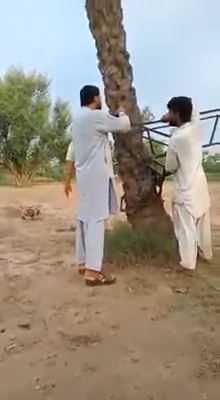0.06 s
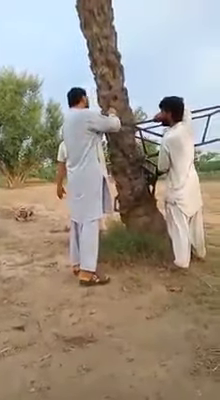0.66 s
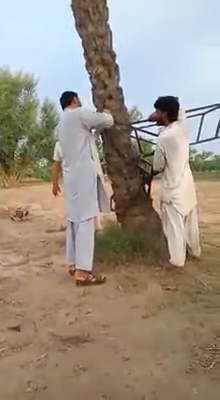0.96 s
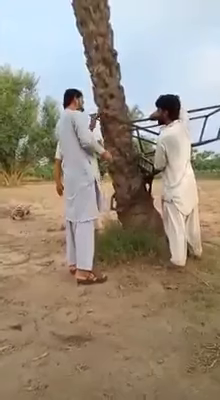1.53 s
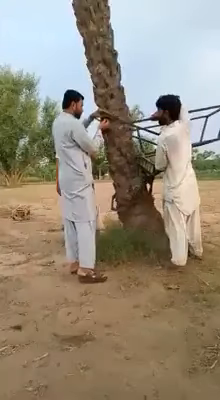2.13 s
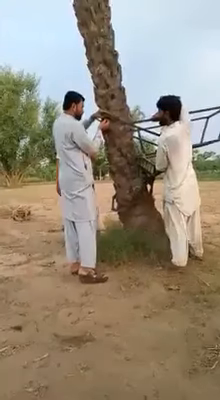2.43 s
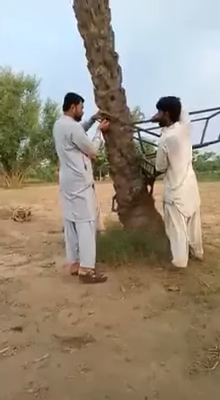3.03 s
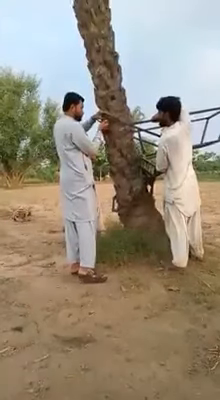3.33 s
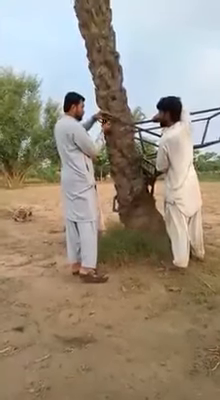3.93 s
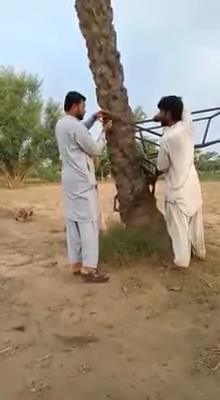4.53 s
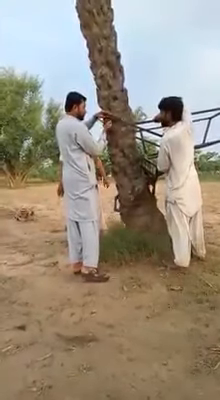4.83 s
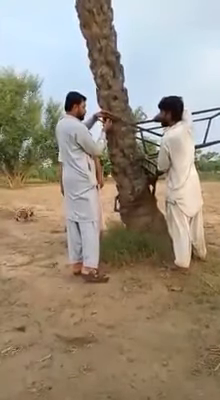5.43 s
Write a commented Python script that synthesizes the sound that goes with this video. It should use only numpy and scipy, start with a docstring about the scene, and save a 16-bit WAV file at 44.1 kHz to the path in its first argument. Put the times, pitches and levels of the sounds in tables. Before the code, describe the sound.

A metal frame cracks and rings against a tree trunk, then a rope rasps in quick tugs, with birds and a distant engine.

```python
"""Rope on a palm trunk

A rope is worked tight round a palm trunk that carries a metal frame, in an open field. The frame
slips on the dry bark with harsh cracks that ring its tubes, then the rope rasps in a run of quick
stick-slip tugs. Birds whistle, leaves stir, a far engine thuds steadily, and the hand-held
microphone takes light puffs of breeze and a few bumps."""
import sys
import numpy as np
from scipy import signal
from scipy.fft import rfft, irfft
from scipy.io import wavfile
from scipy.ndimage import uniform_filter1d

SR = 44100
rng = np.random.default_rng(int(sys.argv[2]) if len(sys.argv) > 2 else 0)


def digitize_waveform(pressure):
    """Quantize a signal to 16-bit integers and store it at the path in sys.argv[1].

    Rows of a 2-D input are taken as channels; values are limited to [-1, 1].
    """
    field = np.atleast_2d(pressure).T
    bounded = np.clip(field, -1, 1)
    quanta = np.round(bounded * 32767).astype(np.int16)
    wavfile.write(sys.argv[1], SR, quanta)


N = 246078
TIME = np.arange(N) / SR


def from_db(db):
    return 10 ** (np.asarray(db) / 20)


def unit_rms(x):
    return x / np.sqrt(np.mean(x ** 2) + 1e-20)


def drift(rate_hz):
    """Random wander, rms 1."""
    knots = rng.standard_normal(8000)
    return unit_rms(np.interp(TIME * rate_hz, np.arange(len(knots)), knots))


def curve(rows):
    """Straight lines through (seconds, value) points."""
    return np.interp(TIME, *np.transpose(rows))


def swells(rows):
    """Gain envelope of Gaussian humps."""
    return sum(from_db(db) * np.exp(-((TIME - s) / half_s) ** 2) for s, half_s, db in rows)


def grains(per_s):
    """Impulses of random time and size."""
    return (rng.random(N) < per_s / SR) * rng.standard_normal(N)


def butter(x, order, hz, kind="low"):
    return signal.sosfilt(signal.butter(order, hz, kind, fs=SR, output="sos"), x + 1e-18)


def colour(x, spectrum):
    """Minimum-phase filter through (Hz, dB) points; keeps the power of white noise."""
    size = 2 ** 18
    hz, db = np.transpose(spectrum)
    bin_hz = np.arange(size // 2 + 1) * SR / size
    gain = unit_rms(from_db(np.interp(np.log(bin_hz + 1), np.log(hz), db)))
    cepstrum = irfft(np.log(gain))
    cepstrum[1:size // 2] *= 2
    cepstrum[size // 2 + 1:] = 0
    return irfft(rfft(x, size) * np.exp(rfft(cepstrum)))[:N]


def outdoors(x, t60_s, wet_db, cutoff_hz):
    """Ground and trees scatter back a short, dull tail."""
    t = TIME[:SR // 2]
    tail = butter(rng.standard_normal(len(t)), 2, cutoff_hz)
    tail *= from_db(-60 * t / t60_s) * (t > .006)
    return x + from_db(wet_db) * signal.fftconvolve(x, tail / np.linalg.norm(tail))[:N]


def patchy(x, depth_db):
    """Each third of an octave swells and fades on its own; the highest hiss stays steady."""
    hz = np.maximum(np.arange(N // 2 + 1) * SR / N, 400)
    thirds, spectrum = 3 * np.log2(hz / 400), rfft(x)
    bands = (irfft(spectrum * np.maximum(1 - np.abs(thirds - k), 0), N) for k in range(11))
    return x + sum(band * (from_db(depth_db * drift(28)) - 1) for band in bands)


# Each row: frequency in Hz, relative gain in dB.
FIELD_SPECTRUM = [(240, -53), (400, -3), (452, -14.5), (595, -3), (957, -14.5), (1030, -8.5), (1170, -8.5),
                  (1340, -4.5), (1880, -5), (2250, -2), (2970, -3.5), (3460, -5), (4030, -6.5), (6990, -29),
                  (15500, -43)]
# Each row: time in seconds, relative level in dB. The tree level drives leaves and far birds.
AIR_LEVEL = [(0.0, -62), (0.45, -65), (0.73, -60), (0.9, -56.5), (1.32, -70.5), (1.6, -74.5), (2.14, -70),
             (2.73, -75.5), (3.34, -69.5), (3.59, -66), (4.07, -70), (4.18, -69), (4.72, -67.5),
             (5.13, -68), (5.21, -65.5), (5.58, -68.5)]
TREE_LEVEL = [(0.0, -56.5), (0.37, -54.5), (0.72, -49.5), (0.81, -54), (0.92, -49), (1.14, -57),
              (1.32, -54.5), (1.48, -60.5), (1.66, -57), (1.94, -56), (2.24, -55), (2.44, -59),
              (2.67, -59.5), (3.2, -54.5), (3.73, -53), (3.87, -58.5), (4.09, -58), (4.65, -56.5),
              (4.89, -57), (5.58, -58.5)]


def field():
    """Open air rushes below, leaves stir above."""
    noise = patchy(colour(rng.standard_normal(N), FIELD_SPECTRUM), depth_db=4.5)
    air = from_db(curve(AIR_LEVEL) + 2) * unit_rms(butter(noise, 4, 1250))
    leaves_db = curve(TREE_LEVEL) - 4 + 0.5 * drift(25)
    return air + from_db(leaves_db) * unit_rms(butter(noise, 4, 1300, "high"))


# Each row: frequency in Hz, relative gain in dB.
EXHAUST_SPECTRUM = [(15, -51.5), (25, -14.5), (66, -3.5), (106, 2.5), (125, 1), (162, -5.5), (231, -7.5),
                    (305, -8.5), (360, -17), (395, -26.5), (441, -27.5), (520, -34.5), (680, -59),
                    (1140, -120)]
# Each row: time in seconds, relative level in dB.
EXHAUST_LEVEL = [(0.0, -52.5), (1.18, -50.5), (1.46, -53), (3.22, -50.5), (3.65, -51), (3.93, -50),
                 (4.52, -49), (5.07, -49.5), (5.58, -49.5)]


def engine(firing_hz=16.1, thud_s=0.021, wash=0.57):
    """Far exhaust thuds, blurred by distance into a throbbing rumble."""
    firings = np.cumsum(firing_hz * (1 + .015 * drift(2.8))) / SR
    throb = np.exp(-(firings % 1) / firing_hz / thud_s)
    exhaust = colour(rng.standard_normal(N) * (throb + wash), EXHAUST_SPECTRUM)
    return from_db(curve(EXHAUST_LEVEL) + 3.5) * unit_rms(butter(exhaust, 3, 68, "high"))


def whistles(rows, waver, flutter_db, rate_hz):
    """Near-pure tones, each gliding through three pitches, unsteady after crossing the air."""
    out = np.zeros(N)
    wobble = waver * drift(rate_hz)
    flutter = flutter_db * np.tanh(drift(rate_hz / 2))
    for s, length_s, start_hz, middle_hz, end_hz, db in rows:
        span = slice(max(round(s * SR), 0), round((s + length_s) * SR))
        progress = np.linspace(0, 1, len(out[span]))
        contour = np.polyfit([0, .5, 1], [start_hz, middle_hz, end_hz], 2)
        hz = np.polyval(contour, progress) * (1 + wobble[span])
        envelope = from_db(db + flutter[span]) * np.abs(np.sin(np.pi * progress)) ** 0.62
        out[span] += envelope * np.sin(2 * np.pi * np.cumsum(hz) / SR)
    return np.sqrt(2) * out


# Each row: start in seconds, length in seconds, pitch in Hz, level in dB. The 1838 Hz row is a thin squeal as
# the frame rubs the trunk; the rest are far off.
HELD_TONES = [(0, 0.49, 232.2, -55.5), (0, 0.77, 600.6, -64), (.56, .26, 1838, -59),
              (1.881, 0.24, 698, -73.5), (4.552, 0.66, 361, -58)]


def held_tones():
    """Faint held tones: most from far off, one a thin steady squeal while the frame rubs."""
    rows = [(s, length_s, hz, hz, hz, db) for s, length_s, hz, db in HELD_TONES]
    return whistles(rows, waver=0.0086, flutter_db=4.5, rate_hz=53)


def far_birds(count=800, low_hz=1200, high_hz=5400):
    """Brief, nearly flat notes at random times, the high ones dulled by distance; rms 1."""
    when, pitch_a, pitch_b, length, slope, faintness = rng.random((count, 6)).T
    pitch = .75 * pitch_a + .25 * pitch_b
    hz = low_hz * (high_hz / low_hz) ** pitch
    bend = 1 + .06 * (slope - .5)
    db = -7 * faintness - 20 * pitch ** 3
    rows = zip(when * TIME[-1], 0.016 + 0.042 * length, hz / bend, hz, hz * bend, db)
    return unit_rms(whistles(rows, waver=0.012, flutter_db=5.5, rate_hz=300))


# Each row: time into the song in seconds, pitch in Hz, relative level in dB.
SONG_CONTOUR = [(0, 3520, -18), (.008, 3560, -1), (.035, 3580, 0), (.06, 3450, 1), (.08, 3120, 1),
                (.1, 2680, -6), (.13, 2290, -5), (.168, 1930, -11), (.19, 1780, -20)]
# Each row: start in seconds, level in dB, swell time in seconds.
SONGS = [(3.093, -54.5, .004), (3.593, -54.5, .059)]


def falling_song(waver=0.0018, flutter_db=3.2):
    """A bird holds one pitch, then slides down without a break."""
    out, wobble, flutter = np.zeros(N), waver * drift(150), flutter_db * drift(73)
    knot_s, knot_hz, knot_db = np.transpose(SONG_CONTOUR)
    for s, db, swell_s in SONGS:
        on = (TIME >= s) & (TIME < s + knot_s[-1])
        t = TIME[on] - s
        hz = np.interp(t, knot_s, knot_hz) * (1 + wobble[on])
        envelope = np.minimum(t / swell_s, 1) * from_db(db + np.interp(t, knot_s, knot_db) + flutter[on])
        out[on] += envelope * np.sin(2 * np.pi * np.cumsum(hz) / SR)
    return np.sqrt(2) * out


def glide(s, length_s, hz, octaves_per_s, db):
    """Row for a whistle that slides evenly through its middle pitch."""
    bend = 2 ** (octaves_per_s * length_s / 2)
    return s, length_s, hz / bend, hz, hz * bend, db


# Each row: start and length in seconds, middle pitch in Hz, glide in octaves per second, level in dB.
BIRD_SLURS = [(.128, .092, 4150, 4.9, -58.5), (.32, .04, 5600, 2.5, -71), (.358, .055, 3700, 5.5, -56.5),
              (.56, .04, 5800, 1.8, -73), (.606, .085, 4080, 4.8, -57.5), (.938, .035, 4780, 3.5, -59.5),
              (1.142, .062, 4790, 3.5, -60), (1.526, .066, 4010, 5.2, -61), (1.687, .06, 3900, 4, -61),
              (1.85, .05, 3900, 1.5, -61.5), (2.007, .08, 3920, 2.8, -62), (5.288, .04, 4950, 3.5, -72),
              (5.464, .1, 5850, 3, -75)]
# Each row: start in seconds, middle pitch in Hz, glide in octaves per second, level in dB.
BIRD_NOTES = [(.094, 3370, 0.5, -60.5), (.20, 2800, 2, -61), (.523, 3360, 0, -61.5),
              (1.094, 2760, 2, -55.5), (1.147, 2920, 2.5, -57), (1.227, 3200, -2, -53.5),
              (1.41, 1516, 3.5, -61.5), (1.69, 1560, 2.5, -58), (1.989, 1610, 2, -61),
              (2.396, 2480, -1, -62), (3.039, 1534, -1, -56), (3.047, 3300, -12, -54),
              (3.976, 3090, -2, -70), (4.179, 3080, 4, -66), (4.39, 3100, 1, -67), (4.599, 3130, 0, -60),
              (4.856, 3220, 0, -64)]
# Each row: start in seconds, level in dB.
BIRD_CHIPS = [(1.05, -50), (1.752, -46), (1.826, -45.5), (1.908, -44), (1.99, -43.5), (2.123, -44.5),
              (4.619, -51)]


def birds(note_s=.058, chip_s=0.0077, chip_hz=3955):
    """Near chips and songs stay dry; slurs, notes and far chatter scatter off the trees."""
    slurs = [glide(*row) for row in BIRD_SLURS]
    notes = [glide(s, note_s, hz, slope, db) for s, hz, slope, db in BIRD_NOTES]
    chips = [glide(s, chip_s, chip_hz, octaves_per_s=38, db=db) for s, db in BIRD_CHIPS]
    near = whistles(chips, waver=.006, flutter_db=0, rate_hz=400) + falling_song()
    calls = whistles(slurs + notes, waver=0.011, flutter_db=6.5, rate_hz=220)
    far = from_db(curve(TREE_LEVEL) - 6) * far_birds()
    return near + outdoors(calls + far, t60_s=0.6, wet_db=-9, cutoff_hz=5930)


# Each row: middle in seconds, level in dB.
PUFFS = [(1.25, -60), (2.5, -55.5), (2.78, -56), (3.2, -59), (3.44, -52.5), (4.62, -65), (5.12, -50)]


def breeze(puff_half_s=0.17, calm_db=-75, lumpy_db=5):
    """Light eddies press on the microphone port, swelling with each puff."""
    eddies = unit_rms(butter(rng.standard_normal(N), 3, [46, 88], "band"))
    flow = from_db(calm_db) + swells((s, puff_half_s, db) for s, db in PUFFS)
    return eddies * flow * from_db(lumpy_db * drift(26))


# Each row: time in seconds, relative level in dB, pitch in Hz.
HOUSING_BUMPS = [(2.196, -24, 111), (2.653, -34, 81.6), (2.715, -25, 105.5), (2.962, -33, 90.5),
                 (2.984, -26.5, 96), (3.425, -34, 79.5)]


def bumps():
    """A short push on the microphone housing swings it for a cycle or two."""
    out = np.zeros(N)
    for s, db, hz in HOUSING_BUMPS:
        t = TIME - s
        push = np.exp(-(t / 0.0016) ** 2)
        swing = np.exp(-np.abs(t) / np.where(t < 0, .003, .012)) * np.cos(2 * np.pi * hz * t)
        out -= from_db(db) * (0.53 * swing + 1.18 * push)
    return butter(out, 2, [52, 330], "band")


# Each row: middle in seconds, half length in seconds, level in dB.
HIGH_HISSES = [(0.708, 0.034, -79), (1.06, .03, -78), (1.54, 0.027, -84), (1.93, 0.021, -83),
               (2.045, .04, -91), (2.132, 0.016, -76.5), (2.215, .022, -84), (2.813, .035, -89),
               (2.95, 0.022, -88), (3.122, .025, -86), (3.362, .018, -90), (4.653, .03, -88),
               (5.52, .06, -87)]


def high_hisses():
    """Brief swells of fine, high hiss: light rustles and the bright edge of bird chips."""
    hiss = butter(grains(per_s=3000), 3, [7200, 9800], "band")
    return unit_rms(hiss) * swells(HIGH_HISSES)


# Each row: frequency in Hz, bandwidth in Hz, relative gain in dB.
TUBE_MODES = [(686, 22, -9), (1160, 110, -7), (1688, 35, -6), (1835, 60, -2), (1985, 60, 1), (2110, 45, -4),
              (2410, 55, 0), (2525, 35, 0), (2645, 43, -2), (2907, 45, -4), (3010, 50, -7), (3321, 54, -5),
              (3700, 60, -3), (3827, 45, -3), (3915, 45, -1), (4025, 55, -1), (4310, 90, -5),
              (4446, 30, -5), (5212, 25, -14)]


def tubes(force, grip_db=2):
    """The frame's tubes resonate; the changing grip drives each mode a little more or less."""
    force = butter(force, 3, 6500)
    out = np.zeros(N)
    for hz, width_hz, db in TUBE_MODES:
        drive = force * from_db(db + grip_db * np.tanh(drift(2.2)))
        radius = np.exp(-np.pi * width_hz / SR)
        feedback = [1, -2 * radius * np.cos(2 * np.pi * hz / SR), radius ** 2]
        out += (1 - radius ** 2) / 2 * signal.lfilter([1, 0, -1], feedback, drive)
    return out


def ring(s, hz, db, t60_s, rise_s=0.0071):
    """One struck tube mode: a sine that swells quickly and dies away."""
    out, at = np.zeros(N), max(round(s * SR), 0)
    t = TIME[:min(SR // 4, N - at)]
    envelope = np.minimum(t / rise_s, 1) * from_db(db - 60 * t / t60_s)
    out[at:at + len(t)] = envelope * np.sin(2 * np.pi * (hz * t + rng.random()))
    return np.sqrt(2) * out


# Each row: middle in seconds, half length in seconds, level in dB.
FRAME_RUBS = [(0.086, 0.14, -56.5), (0.703, 0.08, -54), (1.273, 0.045, -58.5)]


def frame_rubs():
    """Light friction on the trunk keeps the lower tube modes just sounding."""
    friction = butter(grains(per_s=1500), 2, 2100)
    return unit_rms(tubes(friction)) * swells(FRAME_RUBS)


def knocks(rows, gain_db, delay_s=.003):
    """One hard, instant contact at the start of each slip."""
    out = np.zeros(N)
    for s, db, *_ in rows:
        out[round((s + delay_s) * SR)] += from_db(db + gain_db)
    return out


def slips(rows, snaps_per_s, spread_db, hiss, rasp_db, rasp_octaves, onset_db):
    """A contact breaks loose: a shower of snapping fibres rises, holds and dies away."""
    snaps = rng.random(N) < snaps_per_s / SR
    sizes = from_db(spread_db * np.minimum(rng.exponential(1, N), 4)) * rng.choice([-1, 1], N)
    friction = unit_rms(unit_rms(snaps * sizes) + hiss * rng.standard_normal(N))
    friction /= np.sqrt(uniform_filter1d(friction ** 2, size=300) + 1e-9)  # even out the power
    out, size = np.zeros(N), 16384
    hz = np.clip(np.arange(size // 2 + 1) * SR / size, 600, 12000)
    for s, db, rise_s, hold_s, t60_s, tilt_db_per_octave, rasp_hz in rows:
        at, octaves = max(round(s * SR), 0), np.log2(hz / rasp_hz)
        # The contact favours one band, which moves with the tension.
        tone = from_db(tilt_db_per_octave * octaves + rasp_db * np.exp(-(octaves / rasp_octaves) ** 2))
        shower = irfft(rfft(friction[at:at + size], size) * tone)[:N - at]
        t = TIME[:len(shower)]
        level_db = db + onset_db * np.exp(-t / 0.0099) - 60 * np.maximum(t - rise_s - hold_s, 0) / t60_s
        out[at:at + len(t)] += shower * np.minimum(t / rise_s, 1) * from_db(level_db)
    return out


# Each row: frequency in Hz, relative gain in dB.
BARK_SPECTRUM = [(180, -85), (300, -28), (490, -22.5), (680, -9.5), (790, -23.5), (1000, -5.5),
                 (1160, -3.5), (1400, -7), (1600, -8.5), (1820, 1), (2520, -1), (3150, -4), (3750, -5.5),
                 (4400, -4), (4850, -12), (5710, -16), (8460, -25), (11500, -38), (15000, -48)]
# Single tubes after the hardest slips. Each row: start in seconds, pitch in Hz, level in dB.
TUBE_PINGS = [(.418, 2525, -27), (.418, 3321, -35), (.418, 3830, -30), (.418, 5212, -42), (.848, 3705, -31),
              (.848, 4446, -32)]
# Each row: start in seconds, relative level in dB, slide in seconds, tilt in dB per octave, rasp in Hz.
FRAME_SHIFTS = [(.006, -35, 0.0023, -2, 2430), (.2745, -32.5, 0.004, -4, 2470),
                (0.404, -40, .004, -6, 2400), (0.4151, -25.5, 0.0035, 0.5, 2570),
                (.428, -28.5, 0.0088, -0.5, 2520), (.463, -39, 0.0018, -8, 2500),
                (.7595, -33.5, 0.0015, -4, 2470), (.8415, -22.5, 0.0083, -1, 2380),
                (.852, -25.5, 0.0044, -0.5, 4160), (.979, -40.5, 0.012, -4, 2600),
                (1.01, -34, 0.0061, .5, 1980), (1.21, -55.5, 0.024, -7.5, 2380)]


def frame_shifts(creak_share=0.92, creak_db=-14.5, clang_db=-14.5, ring_t60_s=0.13):
    """The frame creaks under strain, then knocks and grinds over the bark; the jolt rings its tubes."""
    # A longer slide rises more slowly and takes longer to settle.
    slides = [(s, db, 0.002013 + 0.18 * slide_s, slide_s, 0.063 + 3.6 * slide_s, tilt, hz)
              for s, db, slide_s, tilt, hz in FRAME_SHIFTS]
    creaks = [(s - creak_share * slide_s, db + creak_db, creak_share * slide_s, 0, t60_s, tilt, hz)
              for s, db, _, slide_s, t60_s, tilt, hz in slides]
    grind = slips(slides + creaks, snaps_per_s=2500, spread_db=-0.5, hiss=0.65,
                  rasp_db=4.5, rasp_octaves=0.17, onset_db=1)
    force = grind + knocks(FRAME_SHIFTS, gain_db=15)
    clang = sum(ring(s + rise_s / 2, hz, db + clang_db + mode_db + tilt * np.log2(hz / 2380), ring_t60_s)
                for s, db, rise_s, _, _, tilt, _ in slides + creaks
                for hz, _, mode_db in TUBE_MODES)
    pings = sum(ring(s, hz, db, ring_t60_s) for s, hz, db in TUBE_PINGS)
    return from_db(-3.5) * colour(force, BARK_SPECTRUM) + tubes(force) + clang + pings


# Each row: frequency in Hz, relative gain in dB.
ROPE_SPECTRUM = [(240, -46.5), (400, -26.5), (620, -12), (850, -22.5), (1020, -10), (1410, -6.5),
                 (2000, -2), (2220, -1.5), (2450, -2), (2770, -2), (2950, -1.5), (3250, -12), (3950, -6.5),
                 (4500, -6.5), (5510, -20), (6320, -25.5), (8960, -40), (11800, -47), (15000, -48)]
# Each row: start in seconds, crack level in dB, crack pitch in Hz, ring level in dB, drag level in dB,
# drag length in seconds, drag pitch in Hz. Levels are relative.
ROPE_TUGS = [(2.29, -57, 2020, -47, -53, 0.033, 1980), (2.753, -50, 2015, -50, -62, 0.0046, 2000),
             (2.957, -51.5, 1950, -53, -53, 0.0099, 2000), (3.3905, -38, 1790, -47, -43, 0.015, 2450),
             (3.607, -40.5, 2450, -59, -38, 0.0059, 1990), (3.824, -36, 2350, -37.5, -40.5, 0.025, 1720),
             (4.037, -33, 2660, -40, -37, 0.043, 2000), (4.251, -36.5, 2480, -34.5, -36.5, 0.021, 2440),
             (4.466, -34.5, 2344, -36, -35.5, 0.0085, 1960), (4.687, -35, 1969, -30, -38, 0.028, 2400),
             (4.909, -32, 2500, -38.5, -35, 0.021, 1950), (5.1371, -27.5, 2396, -32, -38.5, 0.02, 2010),
             (5.362, -30, 2418, -27, -44.5, 0.059, 2350)]
# Extra releases around a tug. Each row: the first four columns of a tug.
ROPE_CATCHES = [(3.4428, -37.5, 2590, -41), (3.627, -42.5, 1870, -58), (3.65, -37, 2420, -54),
                (3.845, -34.5, 1676, -37), (4.057, -42, 2020, -41), (4.095, -38.5, 2520, -51),
                (4.322, -49, 2020, -54), (4.46, -41.5, 1680, -34.5), (4.496, -38, 2032, -32.5),
                (4.528, -31, 2320, -47), (4.705, -39, 2486, -30.5), (4.948, -35.5, 2360, -45),
                (5.126, -36.5, 2400, -48), (5.158, -43, 2440, -42), (5.188, -33, 2130, -50),
                (5.375, -41.5, 2350, -41), (5.42, -43, 2330, -48)]


def rope_tugs(jerks_per_s=88, jerk_depth_db=9):
    """The rope cracks loose, clacks on a tube, rasps over the bark in jerks and sometimes catches."""
    rise_s, tilt_db_per_octave = 0.0021, 2.47
    crack_hold_s, crack_t60_s = 0.0063, 0.047
    catch_hold_s, catch_t60_s = 0.0021, 0.12
    drag_delay_s, drag_rise_s, drag_t60_s = 0.013, 0.0036, 0.15
    cracks = [(s, db, rise_s, crack_hold_s, crack_t60_s, tilt_db_per_octave, hz)
              for s, db, hz, *_ in ROPE_TUGS]
    catches = [(s, db, rise_s, catch_hold_s, catch_t60_s, tilt_db_per_octave, hz)
               for s, db, hz, _ in ROPE_CATCHES]
    drags = [(s + drag_delay_s, db, drag_rise_s, length_s, drag_t60_s, 0, hz)
             for s, *_, db, length_s, hz in ROPE_TUGS]
    jerks = np.cumsum(jerks_per_s * np.exp(.35 * drift(90))) / SR
    stick_slip = from_db(jerk_depth_db * (.5 - jerks % 1))
    snap = slips(cracks + catches, snaps_per_s=1200, spread_db=1.5, hiss=0.34,
                 rasp_db=5, rasp_octaves=0.077, onset_db=-0.5)
    rasp = slips(drags, snaps_per_s=450, spread_db=-1.5, hiss=0.54,
                 rasp_db=5.5, rasp_octaves=0.044, onset_db=-2.5)
    releases = ROPE_TUGS + ROPE_CATCHES
    force = colour(snap + knocks(releases, gain_db=19) + rasp * stick_slip, ROPE_SPECTRUM)
    metal = from_db(-1) * tubes(force)
    rings = sum(ring(s, hz, db, t60_s=0.086) for s, _, hz, db, *_ in releases)
    return from_db(-5) * force + metal + rings


def scene():
    """Rope and frame a few steps away, the field all round; mono."""
    close = frame_shifts() + frame_rubs() + rope_tugs() + high_hisses()
    close = outdoors(close, t60_s=0.16, wet_db=-17, cutoff_hz=4400)
    background = held_tones() + engine() + birds() + field()
    return (close + background + bumps() + breeze())[None]


# Each row: frequency in Hz, relative gain in dB.
MICROPHONE_RESPONSE = [(5000, 1), (5600, -8.5), (6400, 2), (6950, -8.5), (8400, 4), (10000, 1), (10800, -8),
                       (12200, -9.5), (14000, 3.5)]


def record(dry):
    """The microphone's uneven treble, the tallest peaks rounded, then a steep low-pass."""
    ceiling, cutoff_hz = .3, 15700
    heard = from_db(-1.28) * colour(dry[0], MICROPHONE_RESPONSE)
    rounded = ceiling * np.tanh(heard / ceiling)
    return signal.sosfilt(signal.ellip(10, .2, 80, cutoff_hz, fs=SR, output="sos"), rounded)[None]


dry = scene()
out = record(dry)
digitize_waveform(out)
```